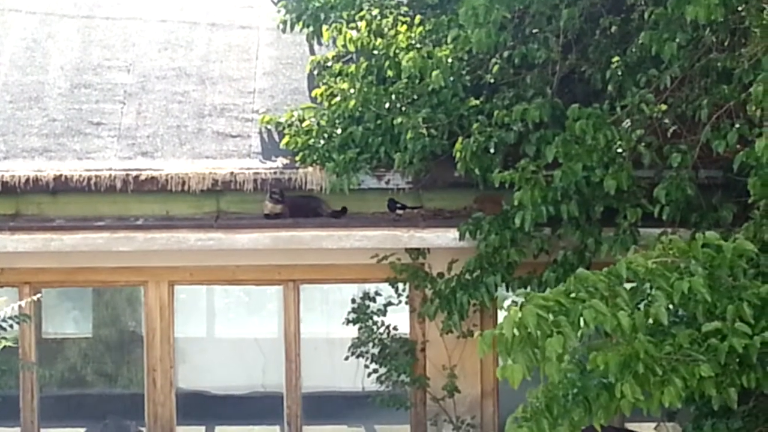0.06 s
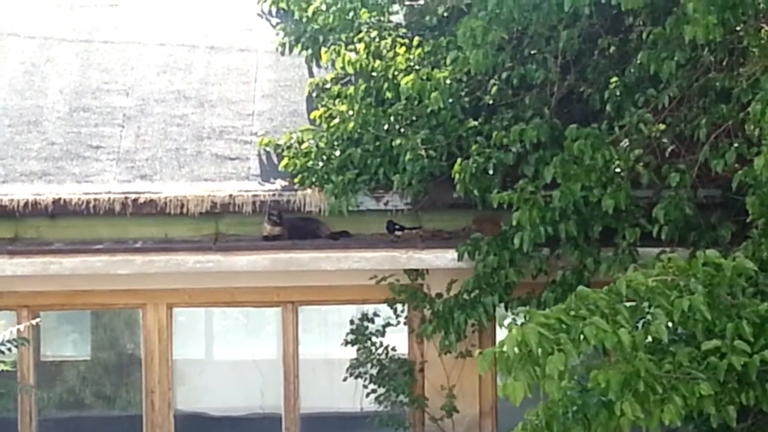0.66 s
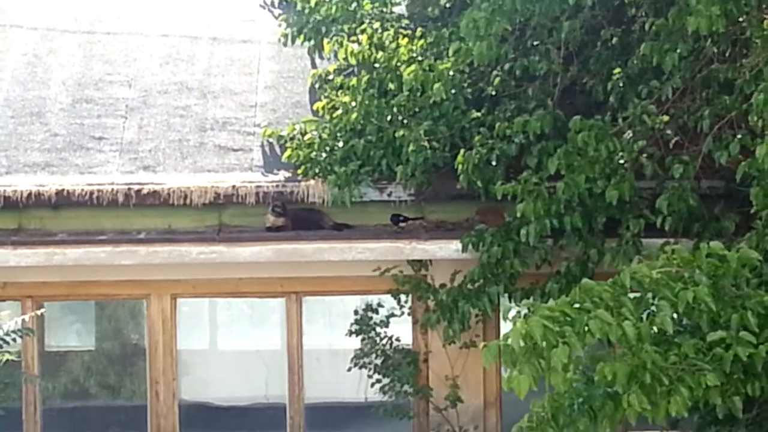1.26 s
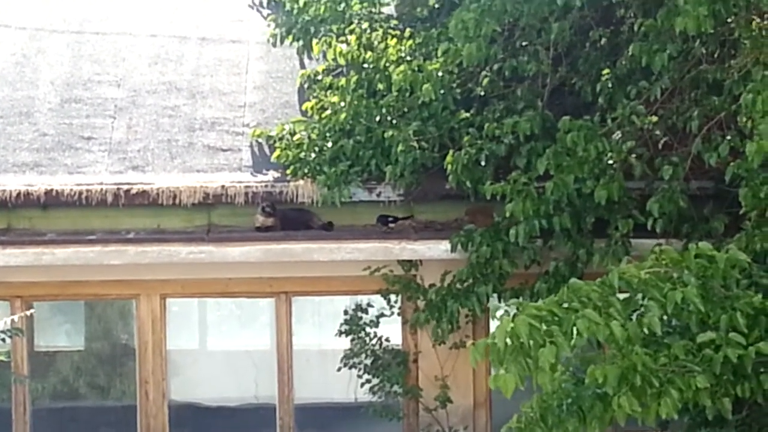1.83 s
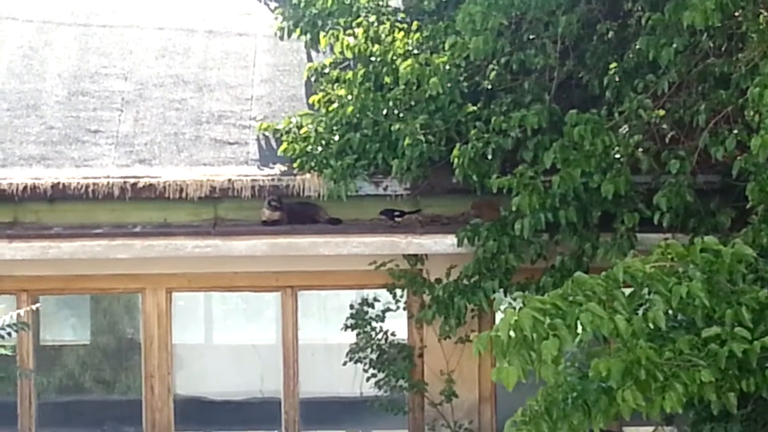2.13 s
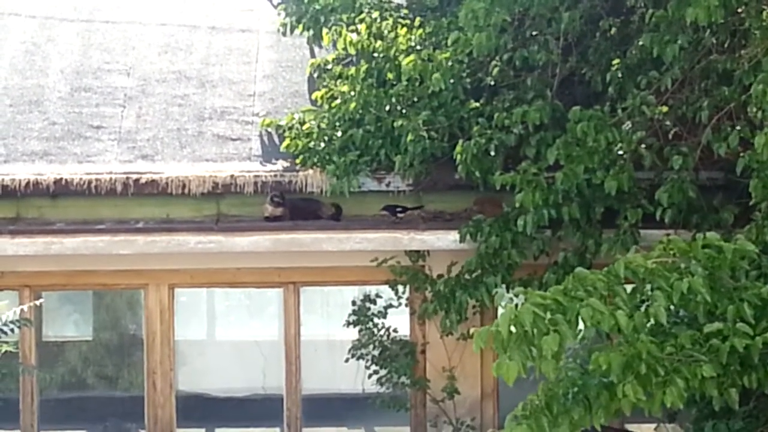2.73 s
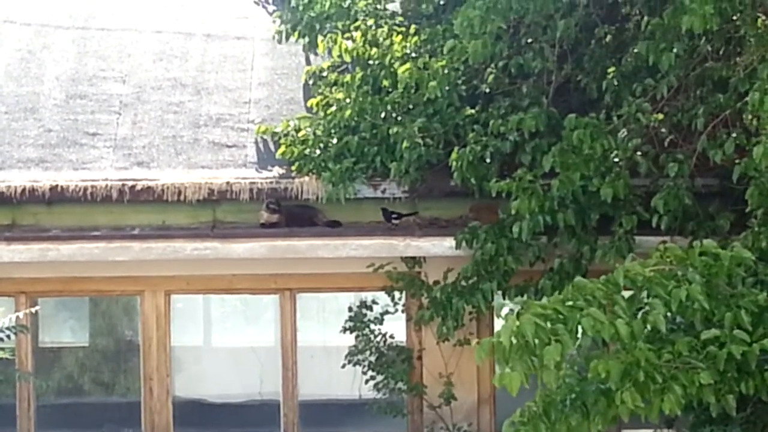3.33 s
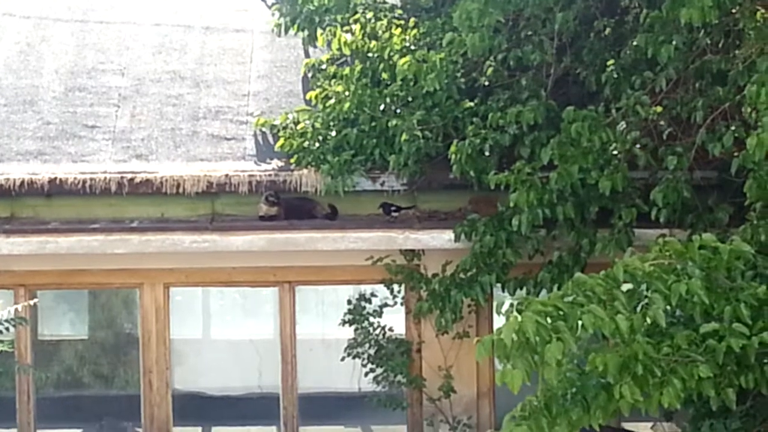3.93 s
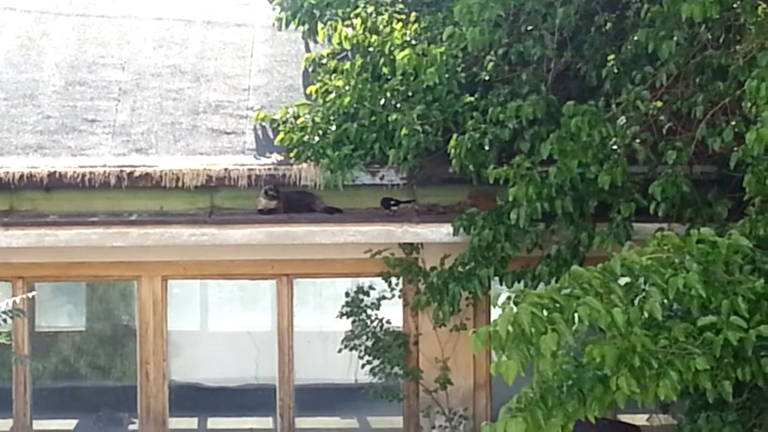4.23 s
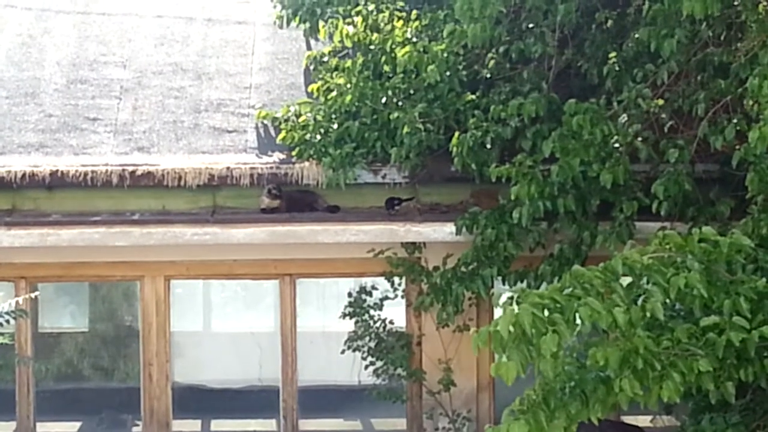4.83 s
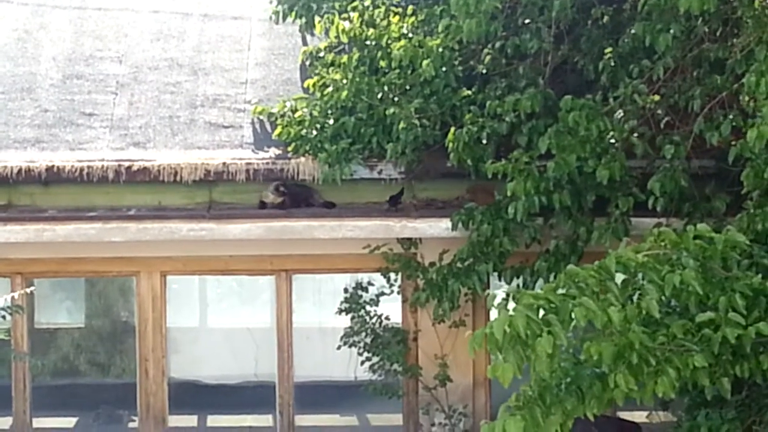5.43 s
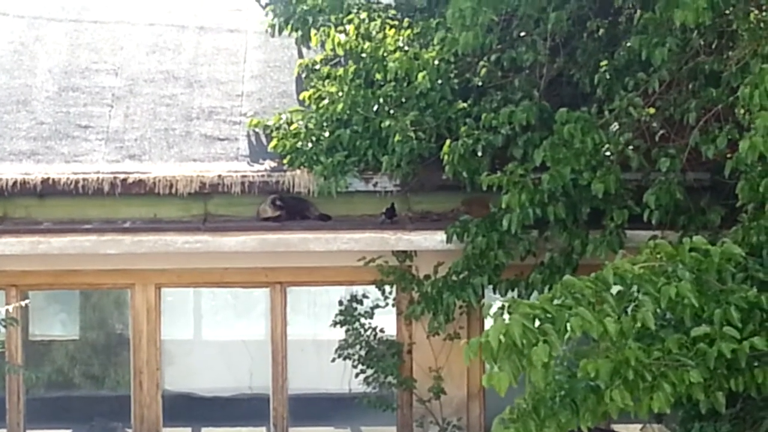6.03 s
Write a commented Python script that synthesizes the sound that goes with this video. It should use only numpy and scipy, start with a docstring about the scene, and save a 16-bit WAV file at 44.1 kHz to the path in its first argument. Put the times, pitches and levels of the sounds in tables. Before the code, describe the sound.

A quiet yard among town houses is heard throughout: a soft, gently swelling murmur of distant traffic, a light even hiss and the faint wavering hum of a far fan. At about 0.7 seconds a distant bird gives one barely audible high whistle. From 1.7 to 2.5 seconds a magpie, much louder than the background, delivers a harsh chattering rattle of ten short rasping notes, slowing slightly as it goes. The notes bounce off nearby walls and leave a brief echo. At about 2.7 and 2.9 seconds the far bird adds two faint, lower whistles, the second shorter and higher than the first. Only the town background continues until 5.4 seconds, when the magpie gives a second ten-note rattle, a little louder, higher and quicker, lasting until about 6.1 seconds.

```python
"""A yard among town houses: a magpie on a low roof scolds a cat with two harsh ten-note rattles.
Each note is a short burst of uneven syrinx pulses through throat and open bill; walls throw it back.
Behind it: three faint whistles of a far bird, the murmur of traffic and the hum of a distant fan."""
import sys
import numpy as np
from scipy import signal
from scipy.fft import rfft, irfft, next_fast_len
from scipy.io import wavfile
from scipy.ndimage import map_coordinates

SR = 44100
rng = np.random.default_rng(int(sys.argv[2]) if len(sys.argv) > 2 else 0)


def store_wav(level_fs):
    """Save 16-bit WAV to argv[1]."""
    pcm = np.round(np.clip(np.atleast_2d(level_fs), -1, 1) * 32767)
    wavfile.write(sys.argv[1], SR, pcm.T.astype(np.int16))


N = 267995

# Rattle notes, slowing through each rattle: peak_s, level_db
RATTLE_NOTES = [(1.692, -32.5), (1.758, -27.5), (1.827, -26), (1.9, -26), (1.975, -26), (2.057, -26),
                (2.14, -26), (2.233, -27), (2.338, -27), (2.448, -27), (5.38, -28.5), (5.444, -21),
                (5.51, -23), (5.58, -23.5), (5.657, -24.5), (5.735, -24.5), (5.817, -24.5), (5.903, -24.5),
                (5.99, -24), (6.072, -25)]
# Voice posture: time_s, pitch_hz, other_side_hz, formant_ratio, throat_hz, ring_db, bill_db
POSTURE = [(1.689, 424.3, 595.5, 0.89, 2350, 0.5, 3), (1.991, 431.6, 600, 1.016, 2400, -3, 0),
           (2.269, 427.6, 612.2, 1.055, 3100, -1.5, -1.5), (5.42, 471.5, 567.5, 0.94, 2850, 10, 1),
           (5.7, 478.7, 559.2, 1.015, 2620, -1, 2), (6.07, 479, 563.6, 0.95, 2620, -4, 4)]
def magpie(easy_db=-26, treble_db_per_db=0.45, usual_rise_s=0.025, usual_hz=443):
    """Two rattles; the voice drifts, louder notes are brighter, higher ones swell faster."""
    voice = np.zeros((2, N))
    times_s, *controls = np.transpose(POSTURE)
    for peak_s, level_db in RATTLE_NOTES:
        posture = [np.interp(peak_s, times_s, control) for control in controls]
        pitch_hz, other_hz, formant_ratio, throat_hz, ring_db, bill_db = posture
        treble_db = bill_db + treble_db_per_db * (level_db - easy_db)
        rise_s = usual_rise_s * (usual_hz / pitch_hz) ** 1.7
        t = np.arange(-SR // 20, SR // 10) / SR
        swell = note_envelope(t, rise_s)
        source = swell * syrinx(t, pitch_hz, other_hz)
        note = throat_and_bill(source, swell, formant_ratio, throat_hz, ring_db, treble_db)
        add(voice, peak_s + t[0], amp(level_db) * among_houses(note))
    return voice


def note_envelope(t, rise_s, attack_s=0.0022, swell_db=11, decay_db_per_s=625,
                  shut_s=0.015, release_s=0.022):
    """A note starts abruptly, swells to its peak at t = 0, decays and is shut off."""
    opening = np.clip((t + rise_s) / attack_s + .5, 0, 1)
    closing = np.clip(1 - (t - shut_s) / release_s, 0, 1)
    return opening * closing * amp(np.minimum(swell_db * t / rise_s, -decay_db_per_s * t))


def syrinx(t, pitch_hz, other_hz, rasp_share=0.34, puff_s=0.00079):
    """The two sides beat at unrelated rates; each slap lets through a puff of noise."""
    pulses = membrane(t, pitch_hz) + membrane(t, other_hz)
    airflow = signal.lfilter([1], [1, -np.exp(-1 / (puff_s * SR))], pulses)
    puffs = airflow * rng.standard_normal(len(t))
    return np.sqrt(1 - rasp_share) * unit(pulses) + np.sqrt(rasp_share) * unit(puffs)


def membrane(t, pitch_hz, jitter_periods=.055, scatter_db=2, arch=.06):
    """Uneven slaps whose rate arches over the note."""
    rate_hz = pitch_hz * (1 - np.clip(arch * (t / t[0] * 2) ** 2, 0, .5))
    cycles = np.cumsum(rate_hz) / SR + rng.random()
    slips, sizes = rng.standard_normal((2, 256))
    slaps = np.flatnonzero(np.diff(np.floor(cycles)))
    slip_samples = (jitter_periods * slips[:len(slaps)] * SR / pitch_hz).astype(int)
    slaps = np.clip(slaps + slip_samples, 0, len(t) - 1)
    return unit(np.bincount(slaps, amp(scatter_db * sizes[:len(slaps)]), len(t)))


# Dark part of the voice: freq_hz, gain_db
BODY_SPECTRUM = [(150, -74), (550, -16.5), (800, -15.5), (940, -17.5), (1080, -1), (1200, 1), (1450, -5),
                 (1620, -0.5), (1850, 1.5), (2300, 1.5), (3000, 5.5), (3700, -11.5), (5500, -66),
                 (9000, -70)]
# Bright part of the voice: freq_hz, gain_db
BILL_SPECTRUM = [(500, -90), (2000, -19), (3300, 2), (4200, 2.5), (5200, 3), (6300, -3), (7200, -11.5),
                 (8600, -11.5), (9700, -18), (10800, -23), (14000, -36)]
def throat_and_bill(source, swell, formant_ratio, throat_hz, ring_db, treble_db):
    """A burst rings the throat, narrower when it rings strongly; a wider bill lets out more treble."""
    body = unit(filtered(source, lambda hz: amp(along(BODY_SPECTRUM, hz / formant_ratio))))
    bill = unit(filtered(source, lambda hz: amp(along(BILL_SPECTRUM, hz))))
    width_hz = 480 * amp(-.4 * ring_db)
    resonance = lambda hz: 1j * hz * width_hz / (throat_hz ** 2 - hz ** 2 + 1j * hz * width_hz)
    throat = unit(filtered(body * np.sqrt(swell), resonance))  # rings most at the peak
    note = amp(5.5) * body + amp(ring_db - 2) * throat + amp(treble_db + 1.5) * bill
    return np.sqrt(np.mean(swell ** 2)) * unit(note)


# Roof and wall beside the bird: delay_s, gain
PERCH_ECHOES = [(.0013, 0.15), (.00212, 0.3), (.00352, 0.39)]
def perch_reflections(note, delay_scatter=.025):
    """Short reflections comb-filter the rasp; they shift as the bird bobs its head."""
    combed = note.copy()
    for delay_s, gain in PERCH_ECHOES:
        add(combed, delay_s * np.exp(delay_scatter * rng.standard_normal()), gain * note)
    return combed * np.std(note) / np.std(combed)


# Colour of the far echoes: freq_hz, gain_db
ECHO_SPECTRUM = [(1000, 4), (2200, 6), (3000, 7), (4300, -5), (10000, 10)]
# Magpie balance: freq_hz, left_minus_right_db
MAGPIE_BALANCE = [(1200, -2), (2200, -5.5), (2700, 7.5), (3400, -2), (4400, -10.5), (6200, -10), (7200, -5),
                  (8600, -13.5), (10500, -2), (13000, 16)]
def among_houses(note, roof_db=-6, near_db=-15, opposite_db=-13, yard_db=-9):
    """A note with reflections from the roof, near walls, the house opposite and the whole yard."""
    direct = np.pad(perch_reflections(note), (0, SR // 2))
    coloured = filtered(direct, lambda hz: amp(along(ECHO_SPECTRUM, hz)))
    roof = amp(roof_db) * walls(direct, delay_s=.0003, spread_s=.006, count=24)
    near = amp(near_db) * walls(direct, delay_s=.015, spread_s=.036, count=30)
    opposite = amp(opposite_db) * walls(coloured, delay_s=.06, spread_s=.028, count=30)
    return panned(direct + roof + near + opposite, MAGPIE_BALANCE) + amp(yard_db) * yard(coloured)


def walls(x, delay_s, spread_s, count):
    """A cluster of reflections, different left and right."""
    lags_s = delay_s + spread_s * rng.random((2, count))
    gains = rng.standard_normal((2, count)) * np.exp(-(lags_s - delay_s) / spread_s)
    responses = [np.bincount((lag_s * SR).astype(int), gain / np.linalg.norm(gain))
                 for lag_s, gain in zip(lags_s, gains)]
    return np.array([signal.fftconvolve(x, response)[:len(x)] for response in responses])


# Yard decay at linger = 1: freq_hz, t60_s
YARD_DECAY = [(500, 0.83), (2000, 0.6), (3000, 0.53), (5000, 0.81), (10000, 0.27)]
def yard(x, linger=1):
    """Diffuse answer of houses and trees; the top treble dies first."""
    hz, t, noise = signal.stft(rng.standard_normal((2, SR * 2 // 3)), SR, nperseg=256)
    t60_s = linger * along(YARD_DECAY, hz)[:, None]
    envelope = amp(-60 * t / t60_s) * (1 - np.exp(-t / 0.0037))
    tail = signal.istft(noise * envelope, SR, nperseg=256)[1]
    return signal.fftconvolve(x[None], tail / np.linalg.norm(tail[0]), axes=1)[:, :len(x)]


# Far whistles: start_s, length_s, start_hz, end_hz, relative_db, waver_fraction
FAR_WHISTLES = [(.66, .29, 3550, 3490, -69, .015), (2.65, .21, 1615, 1628, -53, .009),
                (2.85, .11, 2060, 1960, -59, .05)]
def far_bird(direct_db=-2, echo_db=-1):
    """Soft wavering whistles from another garden, lingering with distance."""
    song = np.zeros(N)
    for start_s, length_s, start_hz, end_hz, relative_db, waver in FAR_WHISTLES:
        size = int(length_s * SR)
        pitch_hz = np.linspace(start_hz, end_hz, size) * (1 + waver * wobble(180, SR)[:size])
        tone = np.sin(2 * np.pi * np.cumsum(pitch_hz) / SR)
        add(song, start_s, amp(relative_db) * signal.windows.tukey(size, .4) * tone)
    return amp(direct_db) * song + amp(echo_db) * yard(song, linger=3)


# Town noise: freq_hz, density_db
TOWN_SPECTRUM = [(25, -18), (36, -27), (55, -19), (80, -18.5), (150, -12.5), (230, -9.5), (330, -6),
                 (450, -9), (680, -8), (950, -13), (1500, -16.5), (2500, -21.5), (4200, -23), (6300, -31.5),
                 (9000, -27), (14500, -29)]
# Left-right likeness of the town: freq_hz, correlation
TOWN_CORRELATION = [(60, 0.49), (130, 0.48), (290, 0.63), (630, 0.6), (1380, -0.11), (3030, 0.11),
                    (6630, -0.13), (14500, 0.052)]
def town(level_db=-52, swell_db=1.43, swell_rate_hz=4.47, traffic_top_hz=900):
    """Far traffic swells slowly under an even hiss."""
    def mid_side_gains(hz):
        angle = np.arccos(np.clip(along(TOWN_CORRELATION, hz), -1, 1)) / 2
        return amp(along(TOWN_SPECTRUM, hz)) * [np.cos(angle), np.sin(angle)]

    mid, side = filtered(rng.standard_normal((2, N)), mid_side_gains)
    air = np.array([mid + side, mid - side]) / np.std(mid)
    traffic = filtered(air, lambda hz: 1 / (1 + (hz / traffic_top_hz) ** 4))
    swell = amp(swell_db * wobble(swell_rate_hz, N))
    return amp(level_db) * (air + (swell - 1) * traffic)


# Fan tones: pitch_hz, level_db, flutter_hz, flutter_depth
FAN_TONES = [(269.2, -68, 10, .6), (317.6, -60, 14, .7), (382.6, -59, 9, .22), (574, -71, 10, .6),
             (672.9, -66, 9, .5), (1346, -77, 3, .7), (4274, -79, 25, .4)]
def fan():
    """Tones of a distant fan flutter on their way through the air."""
    t = np.arange(N) / SR
    hum = np.zeros(N)
    for pitch_hz, level_db, flutter_hz, depth in FAN_TONES:
        flutter = 1 + depth * (wobble(flutter_hz, N) + 1j * wobble(flutter_hz, N))
        hum += amp(level_db) * unit(np.real(flutter * np.exp(2j * np.pi * pitch_hz * t)))
    return hum


def amp(db):
    """Decibels to gain."""
    return 10 ** (np.asarray(db) / 20)


def unit(x):
    """Scale to rms 1."""
    return x / np.sqrt(np.mean(x ** 2) + 1e-20)


def along(points, hz):
    """Interpolate (freq_hz, value) points on a log axis."""
    freqs_hz, values = np.transpose(points)
    return np.interp(np.log(hz + 1), np.log(freqs_hz + 1), values)


def wobble(rate_hz, size):
    """Smooth random curve, rate_hz knots a second."""
    knots = rng.standard_normal(int(size * rate_hz / SR) + 4)
    return map_coordinates(knots, [np.arange(size) * rate_hz / SR])


def filtered(x, response):
    """Apply a frequency response."""
    size = x.shape[-1]
    padded = next_fast_len(size + 4096)
    return irfft(rfft(x, padded) * response(np.fft.rfftfreq(padded, 1 / SR)), padded)[..., :size]


def panned(x, balance):
    """Share each frequency between left and right."""
    return filtered(x, lambda hz: amp(np.outer([.5, -.5], along(balance, hz))))


def add(track, start_s, sound):
    """Mix a sound into a track."""
    part = track[..., round(start_s * SR):][..., :sound.shape[-1]]
    part += sound[..., :part.shape[-1]]


# Town and fan balance: freq_hz, left_minus_right_db
BACKGROUND_BALANCE = [(150, .5), (400, -2), (700, -2), (4300, -3.5), (14000, -2.5)]
def scene():
    """Magpie in front; far bird, town and fan behind."""
    whistles = far_bird()
    return magpie() + whistles + panned(town() + fan(), BACKGROUND_BALANCE)


def record(dry, top_hz=14600):
    """Brick-wall low-pass."""
    return filtered(dry, lambda hz: hz < top_hz)


dry = scene()
out = record(dry)
store_wav(out)
```